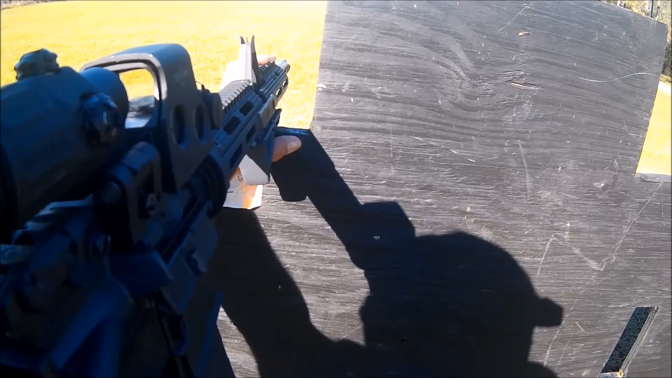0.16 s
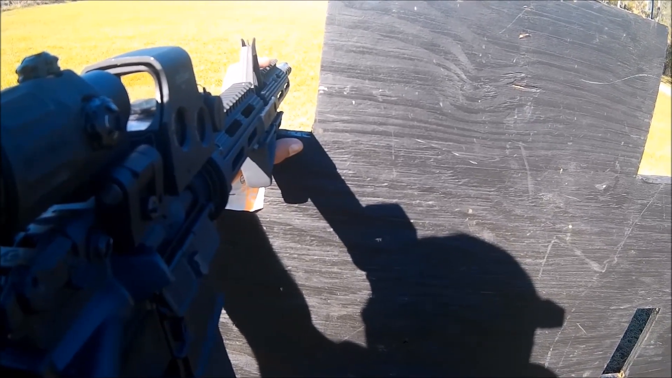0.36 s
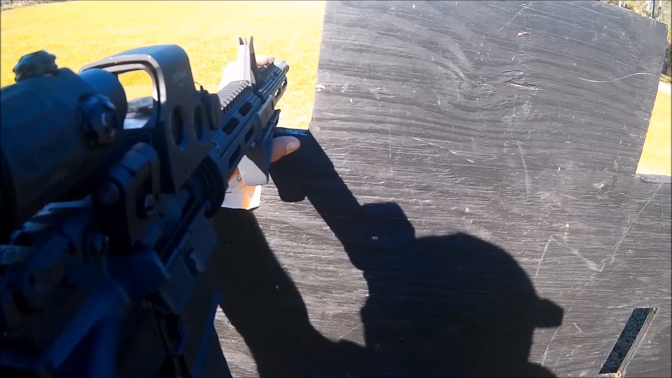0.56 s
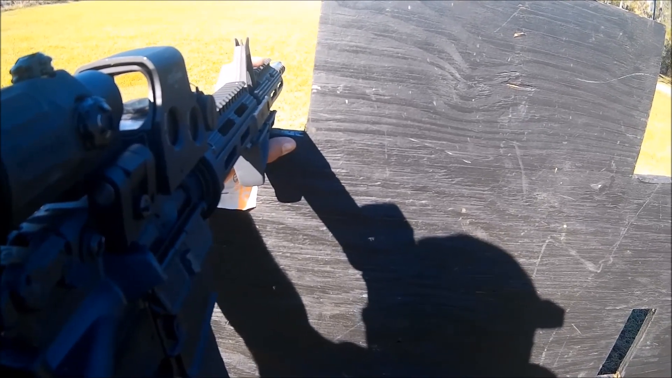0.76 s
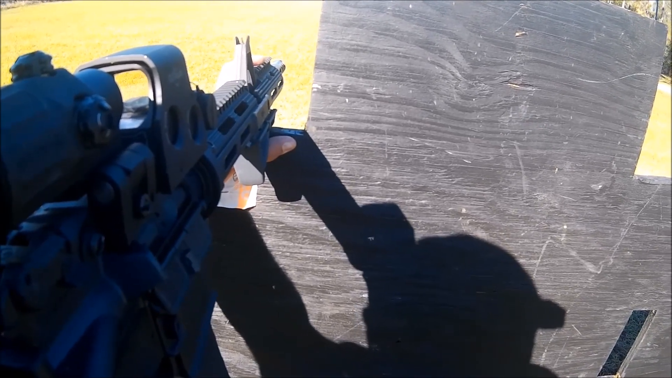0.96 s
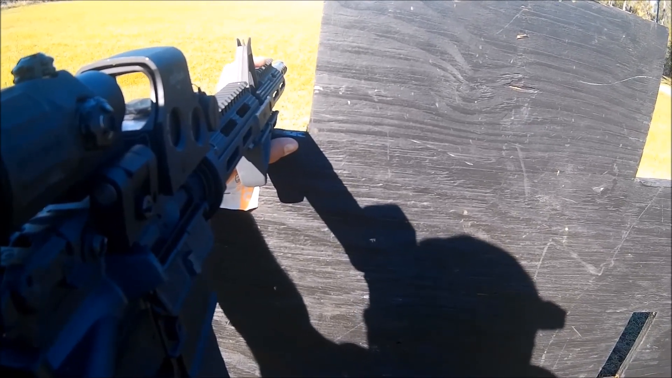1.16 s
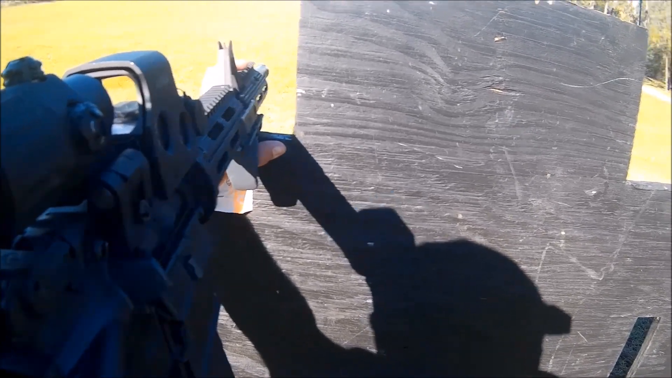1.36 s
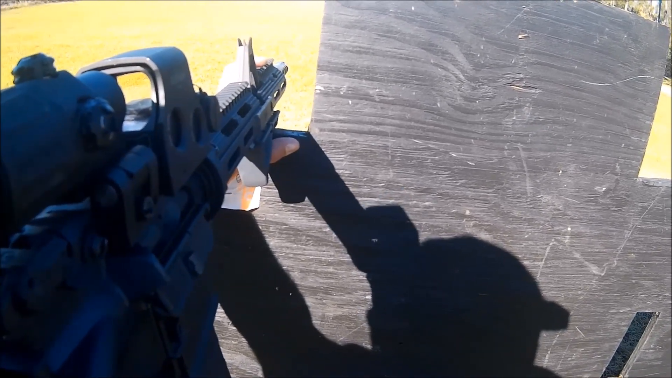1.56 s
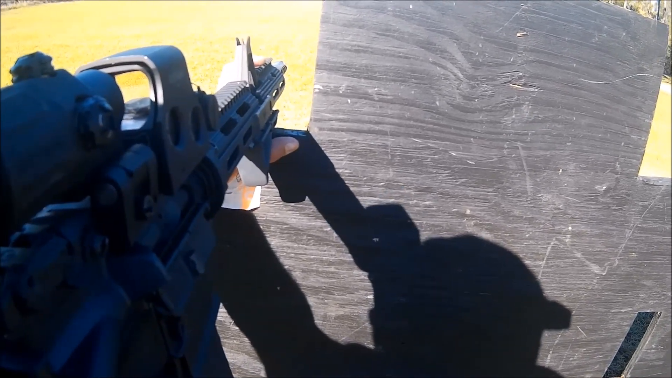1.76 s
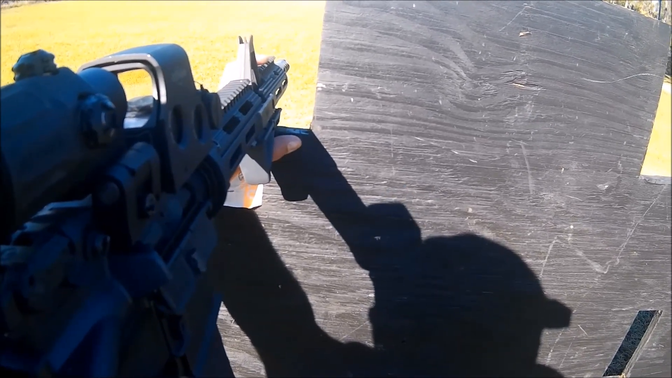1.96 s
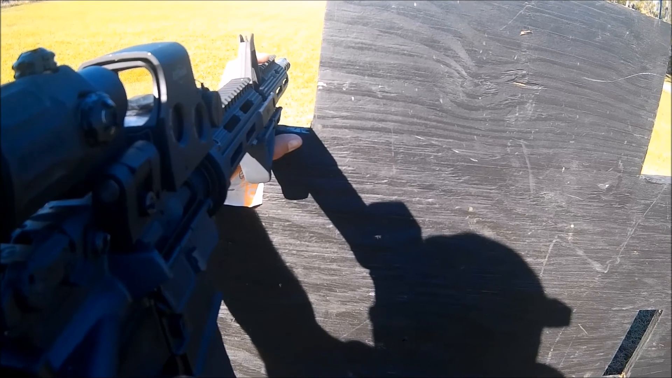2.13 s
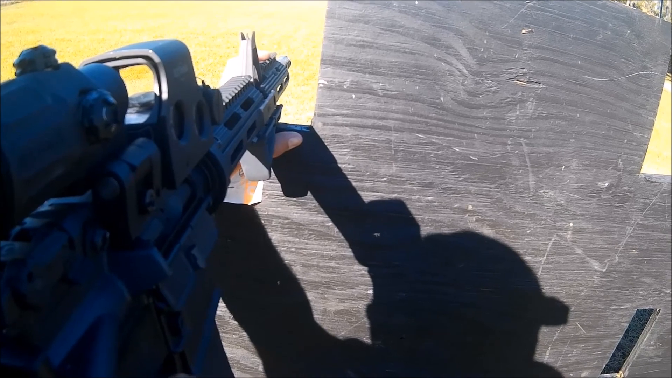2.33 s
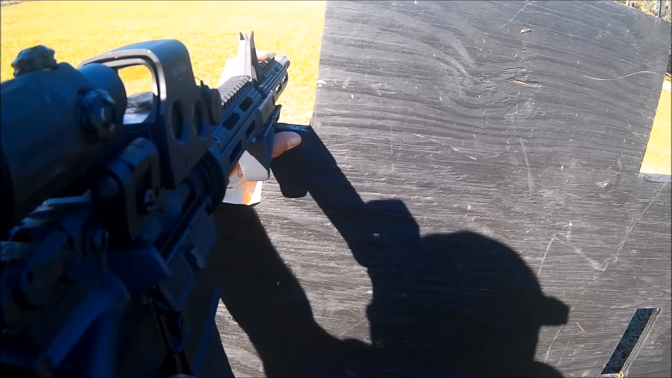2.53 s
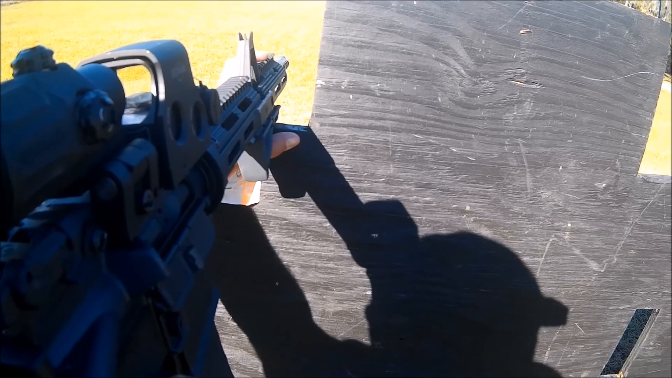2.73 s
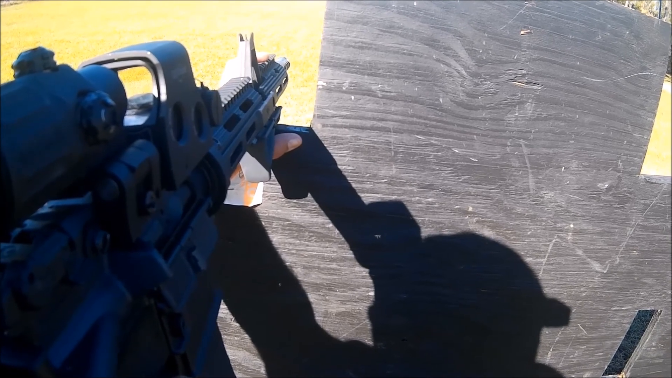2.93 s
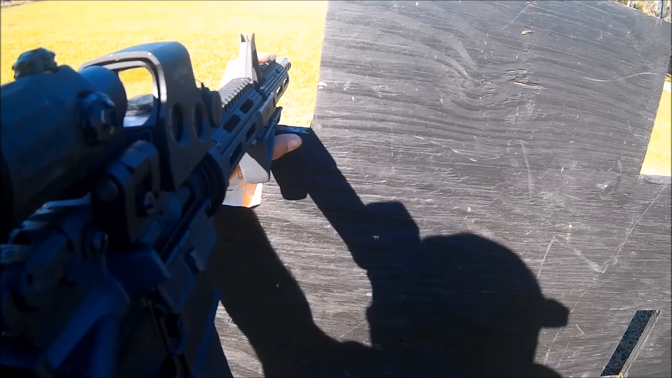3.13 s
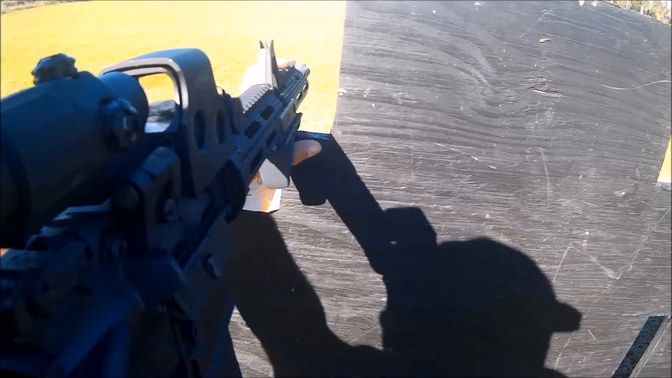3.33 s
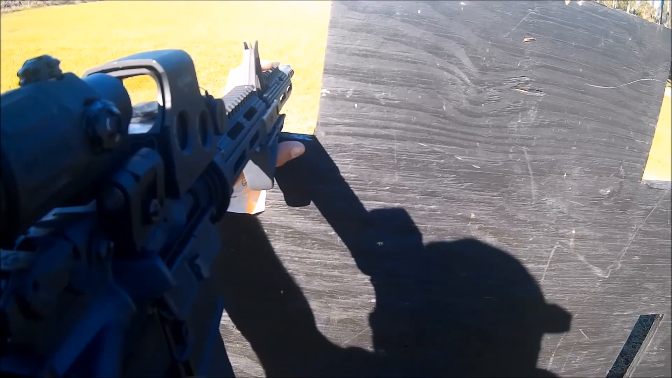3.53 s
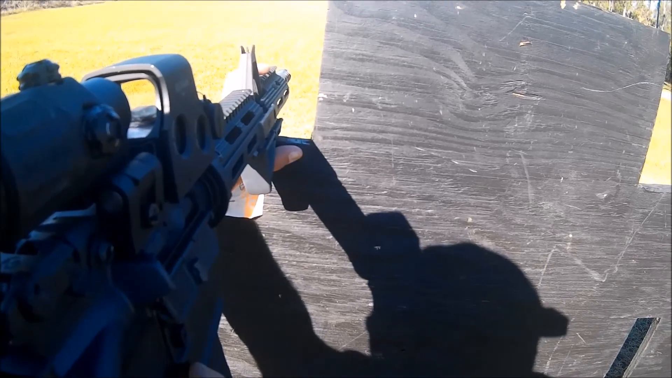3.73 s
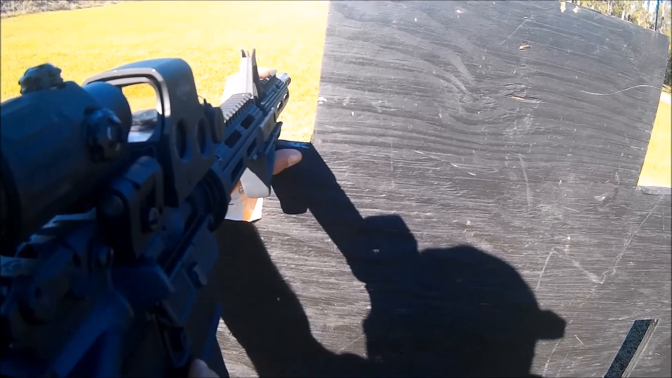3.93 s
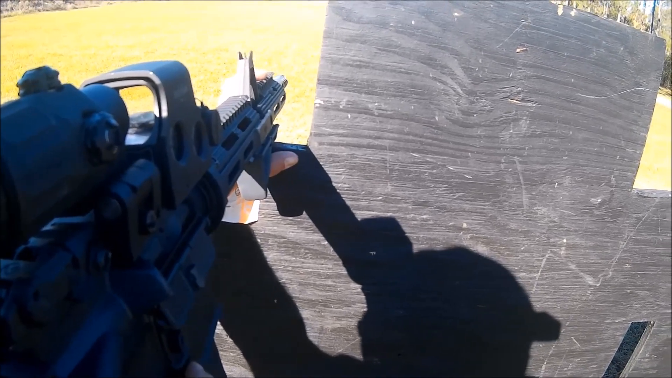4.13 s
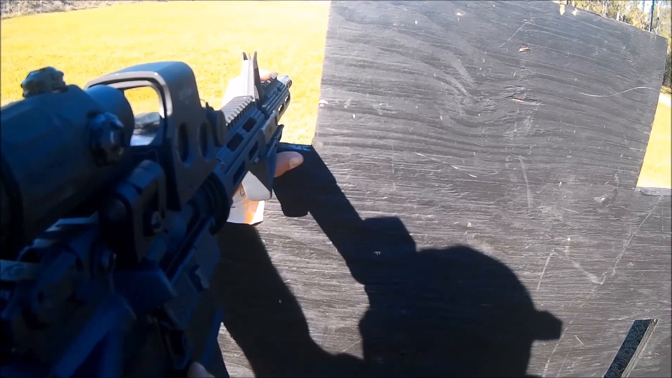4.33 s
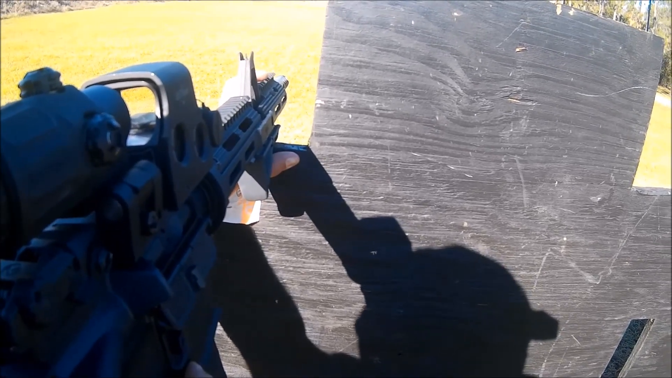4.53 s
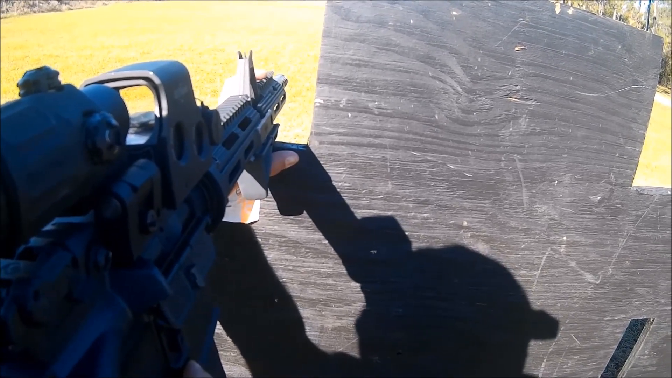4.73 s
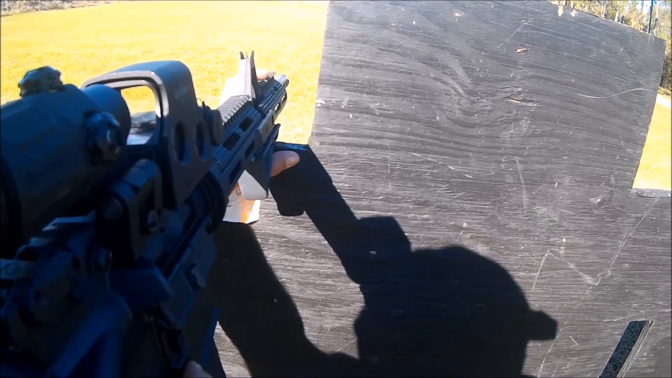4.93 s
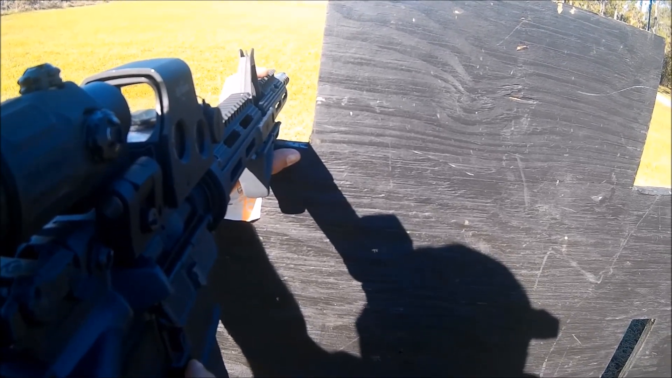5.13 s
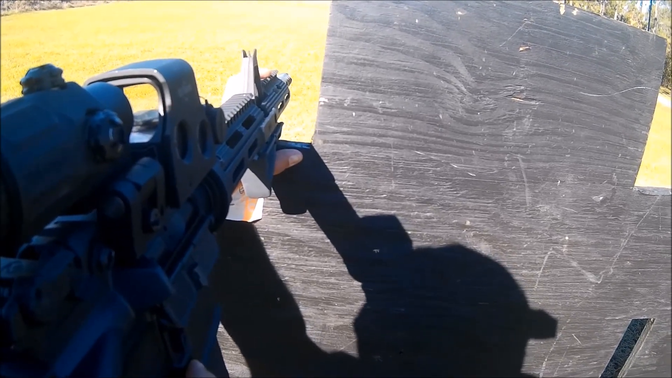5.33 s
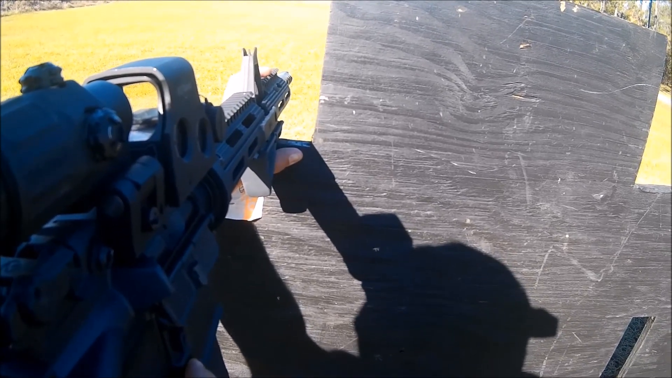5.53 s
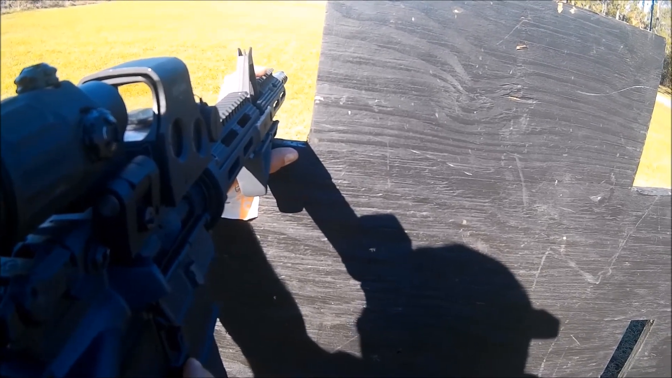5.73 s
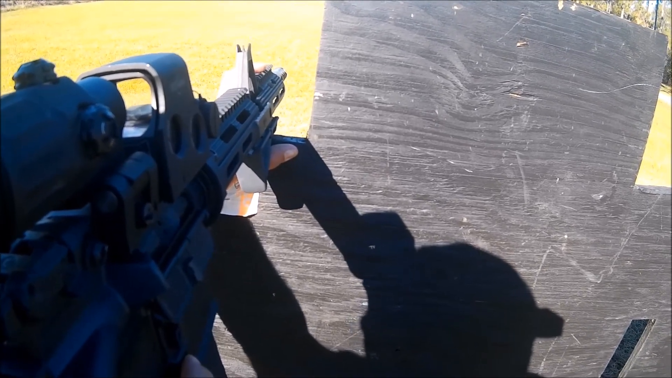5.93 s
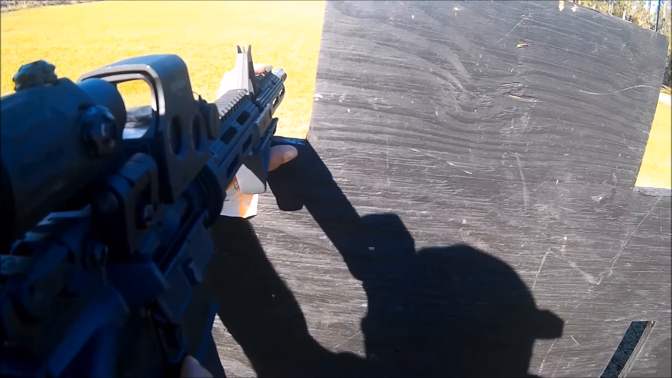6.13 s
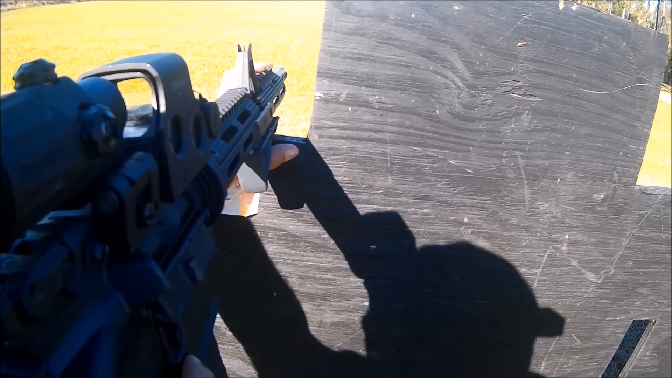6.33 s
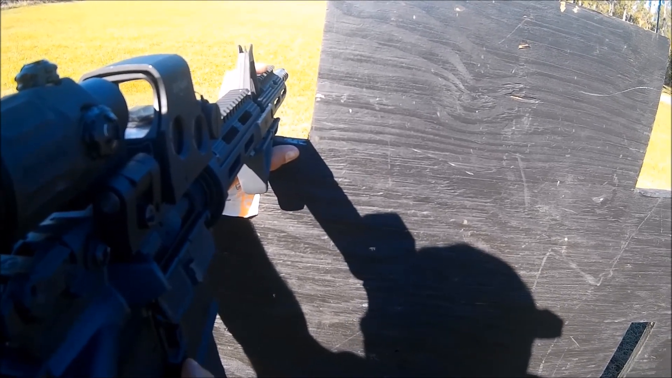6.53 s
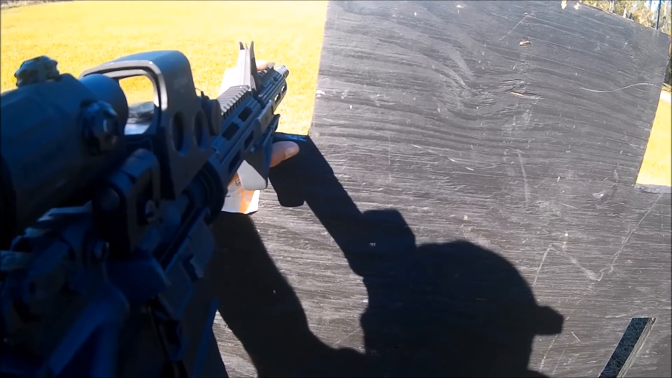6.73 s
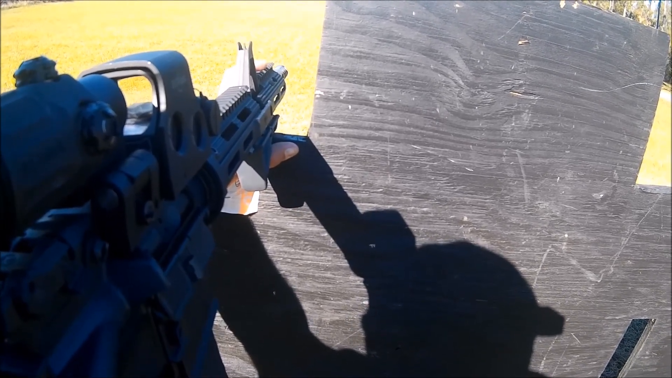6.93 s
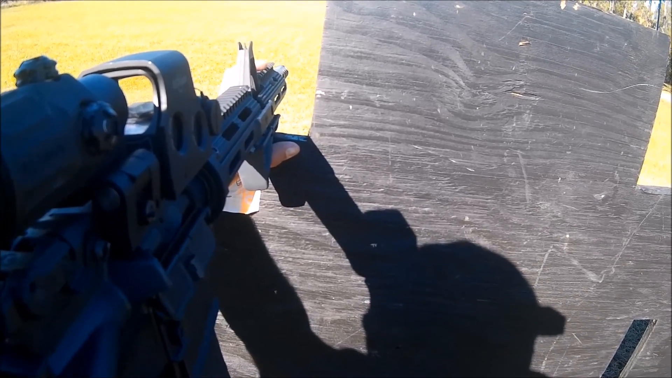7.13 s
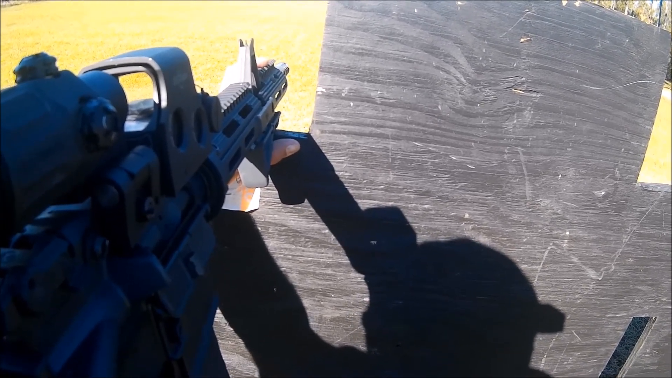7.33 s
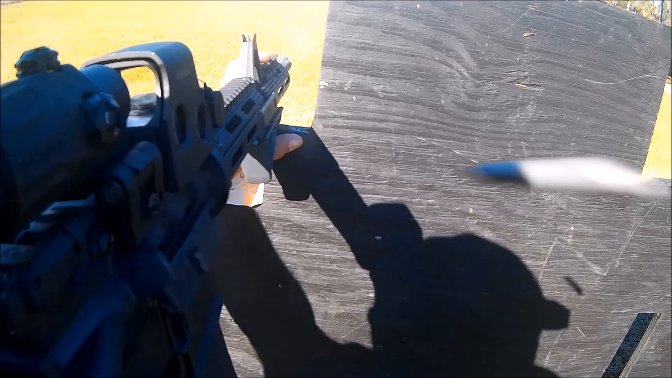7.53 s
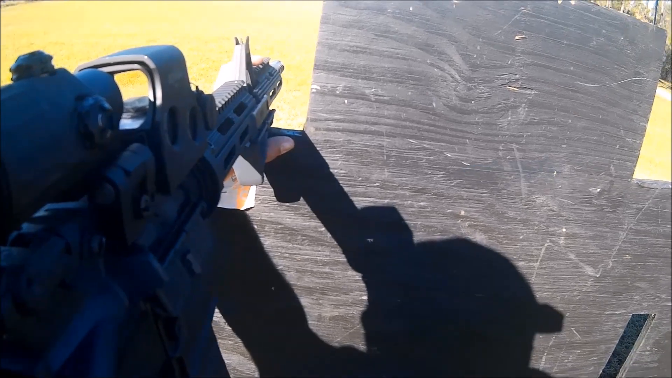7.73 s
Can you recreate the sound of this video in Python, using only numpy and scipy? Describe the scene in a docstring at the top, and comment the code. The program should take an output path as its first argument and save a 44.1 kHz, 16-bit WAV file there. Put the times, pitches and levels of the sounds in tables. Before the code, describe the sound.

Single-channel, very close microphone at the shooter's position outdoors. Echo from a previous shot and distant thuds open the scene, with a faint bullet smack downrange. Then come three widely spaced, clipped carbine blasts, the last near the end, each followed by action clatter, thin metallic ringing and lumpy echoes from a tree line. A spent case bounces brightly after the middle shot; muffled neighbouring gunfire continues over faint air hiss.

```python
"""A carbine fires slow aimed shots beside a plywood barricade on an outdoor range: N waves, a gas jet and scatter,
so close that the microphone overloads. Filtered noise bursts make the bolt's clack; steel-coloured noise rings on.
The tree line returns a long rolling echo: slaps and noise dying band by band. One spent case rings as paired sines.
Other shooters thud farther along the line, with berm slaps; a few bullets smack downrange. Coloured noise is the air."""
import sys
import numpy as np
from scipy import signal
from scipy.fft import rfft, irfft, next_fast_len
from scipy.io import wavfile
from scipy.ndimage import uniform_filter1d

SR = 44100
rng = np.random.default_rng(int(sys.argv[2]) if len(sys.argv) > 2 else 0)


def to_wav(sig):
    """Store sig (one row per channel, or 1-D mono) as 16-bit WAV at the path in sys.argv[1].

    Samples outside -1..1 are clipped; the rate is SR.
    """
    pcm = np.clip(np.atleast_2d(sig), -1, 1) * 32767
    pcm = np.round(pcm).astype(np.int16)
    wavfile.write(sys.argv[1], SR, pcm.T)  # frames by channels


N = 347508
AGE_S = np.arange(5 * SR) / SR
TOP_HZ = 15500  # upper limit of the recorded sound

# still air and microphone hiss: [f/Hz, density/dB]
AIR_COLOUR = [(10, -20), (25, 5), (90, 2), (170, -7), (300, -2), (500, -15), (800, -20), (1300, -25),
              (2500, -25), (5000, -25), (15000, -26)]
AIR_DB = -60.2
# bullets striking downrange: [t/s, level/dB before the low-pass]
SMACKS = [(.1690, -31), (2.4310, -46), (5.487, -57), (6.1272, -56)]
# colour of smacks, cracks and berm spray: [f/Hz, density/dB]
SMACK_COLOUR = [(200, -15), (700, -6), (1150, 0), (1700, -7), (2700, -11), (3800, -30), (5500, -24),
                (7500, -45), (15000, -65)]
# spent case landing and bouncing: [t/s, level/dB, contact softness as cut-off f/Hz]
BOUNCES = [(3.5995, -27, 10000), (3.6312, -28, 6500), (3.7395, -47, 7000)]
# modes of the brass case: [f/Hz, level/dB, t60/s]
BRASS_MODES = [(2745, -12, .16), (3182, -19, .25), (3890, -13, .14), (4480, -13, .1), (4860, -12, .1),
               (5300, -7, .09), (6078, -13, .1), (6400, -9, .08), (6750, -3, .04), (7009, -6, .08),
               (8750, -1, .05), (10900, -15, .02)]
# other shooters: [t/s, level/dB before the thud's filters, berm slap delay/s, echo gain/dB]
NEIGHBOURS = [(.0343, -13.5, .074, -28), (.2053, -12.5, .073, -26), (.3155, -21, .056, -42),
              (.857, -32, .056, -44), (1.7585, -9.5, .056, -33), (2.2708, -13.5, .058, -36),
              (4.1035, -13.5, .056, -36), (4.2503, -13, .055, -35), (5.3135, -25.5, .047, -44),
              (5.462, -39, .056, -58), (5.9520, -26.5, .047, -39), (7.3655, -31, .056, -58)]
# crack level for a 0 dB neighbour; dB of crack per dB of thud
CRACK_DB, CRACK_DB_PER_DB = -32.5, .7

# colour of the far woods' roll: [f/Hz, density/dB]
ROLL_COLOUR = [(30, -4), (90, -2), (170, -5.5), (330, 0), (520, -8), (760, -5.5), (1100, -12), (2000, -12),
               (2900, -16), (3800, -29), (8000, -38), (15000, -58)]
# decay of the roll, treble lost to the air: [f/Hz, t60/s]
ROLL_DECAY = [(40, 7), (150, 5.9), (320, 7.5), (750, 6.2), (1200, 3.7), (2500, 3), (5000, 2), (12000, 1)]
# colour of the tree line's answer: [f/Hz, density/dB]
TREE_COLOUR = [(30, -25), (80, -19), (130, -3), (200, 0), (270, -1), (380, -5), (520, -15), (770, -9),
               (1100, -19), (1600, -24.5), (2700, -25), (3700, -36), (8000, -36), (15000, -70)]
# air loss on longer paths, on top of the tree swell: [f/Hz, t60/s]
TREE_DECAY = [(100, 30), (1000, 15), (3000, 6), (6000, 2), (12000, .8)]
# clearest slaps off berm and big trunks: [delay/s, level/dB before filters, overpressure/s]
SLAPS = [(.1215, -20, .0010), (.1445, -7, .0006), (.2175, -9, .0018), (.2505, -10, .0018),
         (.296, -8, .0006)]
SLAP_SHARPNESS = 1.3  # top/Hz times overpressure/s: longer slaps have rounder fronts
# nearest trunks start the answer; it swells, holds over the depth of the wood and dies
TREES_DB, TREES_START_S, TREES_RISE_S, TREES_HOLD_S, TREES_T60_S = -20, .115, .05, .14, .92

# contacts of the action: [t/s from bolt closing, level/dB, t60/s]
ACTION_CONTACTS = [(-.0140, -15, .035), (-.0030, -10, .02), (-.0005, 2, .012), (.002, -12, .07),
                   (.059, -22, .02)]
# resonances of the action: [f/Hz, width/Hz, level/dB]
RECEIVER_MODES = [(340, 160, -6), (1250, 500, -11), (2170, 500, -7), (3450, 380, -15), (4730, 200, -15),
                  (5590, 300, -11), (6800, 380, 2), (7880, 700, -9), (9000, 700, -16), (11300, 800, -16)]
# dense high ring of the carbine's steel: [f/Hz, density/dB]
STEEL_COLOUR = [(1500, -30), (4000, -14), (4700, -9), (6000, -13), (6600, 0), (7500, -1), (8800, -8),
                (10200, -22), (11700, -16), (13000, -23), (16000, -34)]
# scatter off things close by: [f/Hz, density/dB]
NEAR_COLOUR = [(30, -3), (100, -12), (180, 0), (350, 1), (560, -11), (730, -12), (1200, -23), (2200, -22),
               (3500, -35), (7000, -32), (12000, -42), (16000, -56)]
# muzzle blast: direct, then off barricade, ground and shooter:
# [delay/s, level/dB before the low-pass, overpressure/s]
BLAST_PATHS = [(.0007, 22, .0016), (.0041, 33, .0033), (.0096, 20, .0015), (.0121, 15, .0011),
               (.0152, 1, .0014), (.0191, 9, .0010), (.0243, -7, .0012)]
# later paths are duller: the top falls by a factor e in BLAST_DULLS_S
BLAST_TOP_HZ, BLAST_DULLS_S = 15000, .0065
# carbine shots, the first already rolling away: [t/s, level/dB, bolt closing delay/s]
SHOTS = [(-0.70, 0, .062), (1.2866, 0, .0625), (3.2178, 0, .0605), (7.5332, 0, .0625)]


def from_db(db):
    """Decibels to gain."""
    return 10 ** (np.asarray(db) / 20)


def at_hz(points, hz):
    """Read a table on a log-frequency axis."""
    table = np.array(points)
    return np.interp(np.log(hz + 1e-9), np.log(table[:, 0]), table[:, 1])


def fade(t60_s, size):
    """Exponential decay from 1."""
    return np.exp(-np.log(1000) * AGE_S[:size] / t60_s)


def cut(x, hz, kind, order=2):
    """Causal low-pass or high-pass."""
    sos = signal.butter(order, min(hz, SR / 2 - 1), kind, fs=SR, output="sos")
    return signal.sosfilt(sos, x + 1e-18)


def add(track, start_s, sound):
    """Mix a sound into a track at a time, which may lie before the start."""
    at = round(start_s * SR)
    part = sound[max(-at, 0):max(len(track) - at, 0)]
    track[max(at, 0):max(at, 0) + len(part)] += part


def noise(colour, size, lumpy_db=0):
    """Coloured noise, rms 1; when lumpy it comes in clumps a few milliseconds long."""
    clumps = uniform_filter1d(rng.standard_normal(size), size=300)
    lump_gain = from_db(lumpy_db * np.clip(clumps / np.std(clumps), -2, 2))
    white = rng.standard_normal(size) * lump_gain
    colour_gain = from_db(at_hz(colour, np.fft.rfftfreq(size, 1 / SR)))
    x = irfft(rfft(white) * colour_gain, size)
    return x / np.std(x)


def resonate(x, hz, width_hz):
    """Two-pole resonance with gain 1 on top."""
    r = np.exp(-np.pi * width_hz / SR)
    zeros = np.array([1, 0, -1]) * (1 - r * r) / 2
    poles = [1, -2 * r * np.cos(2 * np.pi * hz / SR), r * r]
    return signal.lfilter(zeros, poles, x)


def waver(size, turns_per_s):
    """Random values between -1 and 1, joined by straight lines."""
    turns = rng.uniform(-1, 1, SR // 50)
    return np.interp(AGE_S[:size] * turns_per_s, np.arange(len(turns)), turns)


def dying_noise(colour, decay, size, lumpy_db, patchy_db, patches_per_s, count=32):
    """Scattered sound: each band wavers on its own and dies at its own rate."""
    spectrum = rfft(noise(colour, size, lumpy_db))
    centres_hz = np.geomspace(100, TOP_HZ, count)
    hz = np.fft.rfftfreq(size, 1 / SR)
    out = np.zeros(size)
    for centre_hz, share in zip(centres_hz, np.eye(count)):
        band = irfft(spectrum * np.interp(hz, centres_hz, share), size)
        patches = from_db(patchy_db * waver(size, patches_per_s))
        out += band * fade(at_hz(decay, centre_hz), size) * patches
    return out


def blast_wave(push_s, suction=1):
    """N wave: shock, fall through zero into suction (length relative to push), closing shock."""
    t = AGE_S[:SR // 8] / push_s
    return (1 - t) * (t < 1 + suction)


def arrivals(paths, suction=.66):
    """N waves along paths (delay/s, level/dB, overpressure/s, top/Hz), fronts rounded by a low-pass."""
    out = np.zeros(len(AGE_S))
    for delay_s, db, push_s, top_hz in paths:
        add(out, delay_s, from_db(db) * cut(blast_wave(push_s, suction), top_hz, "low"))
    return out


def air():
    """Still air and hiss: steady coloured noise."""
    return from_db(AIR_DB) * noise(AIR_COLOUR, next_fast_len(N))[:N]


def bullet_smacks(t60_s=.055, top_hz=2100):
    """Bullets striking downrange: short, dull noise bursts."""
    out, size = np.zeros(N), SR // 10
    for start_s, db in SMACKS:
        burst = noise(SMACK_COLOUR, size) * fade(t60_s, size)
        add(out, start_s, from_db(db) * cut(burst, top_hz, "low"))
    return out


def spent_case(tick_db=2, tick_t60_s=.016, ring_db=-8.5, split=.009):
    """Brass ticks on hard ground; each bounce rings split mode pairs with new strengths."""
    out, size = np.zeros(N), SR // 2
    for start_s, db, soft_hz in BOUNCES:
        ring = np.zeros(size)
        for mode_hz, mode_db, t60_s in BRASS_MODES:
            for side in (-1, 1):
                hz = mode_hz * (1 + side * split)
                gain = from_db(mode_db + rng.normal(0, 2))
                cycles = hz * AGE_S[:size] + rng.random()
                ring += gain * np.sin(2 * np.pi * cycles) * fade(t60_s, size)
        tick = cut(rng.standard_normal(size), 4000, "high") * fade(tick_t60_s, size)
        contact = from_db(ring_db) * ring + from_db(tick_db) * tick
        add(out, start_s, from_db(db) * cut(contact, soft_hz, "low", order=6))
    return out


def thud(push_s=.0042, suction=.75, low_hz=52, top_hz=450):
    """Blast from down the line: an N wave with rounded fronts."""
    return cut(cut(blast_wave(push_s, suction), top_hz, "low"), low_hz, "high")


def berm_slap(thump_db=-16, spray_db=-29.5, spray_t60_s=.2, spray_top_hz=1700):
    """The berm returns a neighbour's shot as a weak thump smeared into a spray."""
    size = SR // 2
    spray = noise(SMACK_COLOUR, size) * fade(spray_t60_s, size)
    out = from_db(spray_db) * cut(spray, spray_top_hz, "low")
    add(out, 0, from_db(thump_db) * thud(push_s=.003))
    return out


def neighbours(trees, roll, crack_t60_s=.085, scatter_db=-21, scatter_t60_s=.5, scatter_top_hz=2500,
               trees_db=0, roll_gain_db=13.5, echo_top_hz=900, far_trees_db=1, far_trees_s=.4):
    """Thud, thin crack, scatter, berm slap and a dull answer from near and far woods."""
    out, size = np.zeros(N), SR // 2
    woods = from_db(trees_db) * trees + from_db(roll_gain_db) * roll
    add(woods, far_trees_s, from_db(far_trees_db) * trees)
    echo = cut(woods, echo_top_hz, "low")
    for start_s, db, slap_s, echo_db in NEIGHBOURS:
        crack_db = CRACK_DB + CRACK_DB_PER_DB * db
        crack = noise(SMACK_COLOUR, size) * fade(crack_t60_s, size)
        scatter = noise(NEAR_COLOUR, size) * fade(scatter_t60_s, size)
        add(out, start_s, from_db(db) * thud())
        add(out, start_s, from_db(crack_db) * crack)
        add(out, start_s, from_db(db + scatter_db) * cut(scatter, scatter_top_hz, "low"))
        add(out, start_s + slap_s, from_db(db) * berm_slap())
        add(out, start_s, from_db(echo_db) * echo)
    return out


def far_roll(level_db=-34.3, start_s=.12, rise_s=.2, lumpy_db=1.4, surge_db=1.6, surges_per_s=9,
             patchy_db=2.5, patches_per_s=12):
    """Echoes from ever farther woods return in uneven waves."""
    size = len(AGE_S)
    rise = np.clip((AGE_S - start_s) / rise_s, 0, 1)
    level = from_db(level_db + surge_db * waver(size, surges_per_s)) * rise
    return level * dying_noise(ROLL_COLOUR, ROLL_DECAY, size, lumpy_db, patchy_db, patches_per_s)


def tree_swell(t_s):
    """Attack, hold and release of the tree line's answer, top 1."""
    rise = np.clip((t_s - TREES_START_S) / TREES_RISE_S, 0, 1)
    past_hold_s = np.maximum(t_s - TREES_START_S - TREES_RISE_S - TREES_HOLD_S, 0)
    return rise * from_db(-60 * past_hold_s / TREES_T60_S)


def trunk_slaps(level_db=-17.5, spread_db=2.5, depth_s=.4, shortest_s=.0004, longest_s=.0016, count=12):
    """Lesser slaps from trunks scattered through the wood: rows like SLAPS."""
    place, strength, girth = rng.random((count, 3)).T
    delay_s = TREES_START_S + depth_s * (np.arange(count) + place) / count
    swell_db = 20 * np.log10(tree_swell(delay_s) + 1e-9)
    db = level_db + spread_db * (2 * strength - 1) + swell_db
    push_s = shortest_s + (longest_s - shortest_s) * girth
    return list(zip(delay_s, db, push_s))


def tree_echo(lumpy_db=2.4, patchy_db=4, patches_per_s=45, slap_low_hz=125, slap_top_hz=1800):
    """Countless trunks answer as one lumpy swell, with a few slaps standing out."""
    size = 2 * SR
    paths = [(delay_s, db, push_s, SLAP_SHARPNESS / push_s)
             for delay_s, db, push_s in SLAPS + trunk_slaps()]
    out = cut(cut(arrivals(paths), slap_low_hz, "high"), slap_top_hz, "low")
    wash = dying_noise(TREE_COLOUR, TREE_DECAY, size, lumpy_db, patchy_db, patches_per_s)
    add(out, 0, from_db(TREES_DB) * wash * tree_swell(AGE_S[:size]))
    return out


def action(level_db=-1.5, steel_db=-41.5, steel_t60_s=1.02, closes_s=.06):
    """Carrier hits the buffer, strips a round and slams shut; the steel rings on from the shot."""
    contacts = np.zeros(SR)
    for start_s, db, t60_s in ACTION_CONTACTS:
        burst = rng.standard_normal(SR // 8) * fade(t60_s, SR // 8)
        add(contacts, closes_s + start_s, from_db(db) * burst)
    clack = np.zeros(SR)
    for k, (hz, width_hz, db) in enumerate(RECEIVER_MODES):
        clack += (-1) ** k * from_db(db) * resonate(contacts + 1e-18, hz, width_hz)  # alternating polarity
    steel = noise(STEEL_COLOUR, SR) * fade(steel_t60_s, SR)
    return from_db(level_db) * clack + from_db(steel_db) * steel


def muzzle(gas_db=16, gas_t60_s=.019, gas_peak_s=.0019, gas_top_hz=8500,
           heave_db=11.5, heave_hz=40, heave_t60_s=.052, near_db=4.5, near_t60_s=.066,
           linger_db=-29, linger_t60_s=.7, linger_top_hz=900):
    """Blast and first reflections, tearing gas jet, slow heave and scatter from things close by."""
    size = SR // 2
    t = AGE_S[:size]
    jet_rise = np.minimum(t / gas_peak_s, 1) ** 2
    jet_fall = from_db(-60 * np.maximum(t - gas_peak_s, 0) / gas_t60_s)
    jet = from_db(gas_db) * cut(rng.standard_normal(size), gas_top_hz, "low") * jet_rise * jet_fall
    # the ball of gas expands and falls back in a slow, damped swing
    heave = from_db(heave_db) * np.sin(2 * np.pi * heave_hz * t) * fade(heave_t60_s, size)
    near = noise(NEAR_COLOUR, size)
    scatter = from_db(near_db) * near * fade(near_t60_s, size)
    dull = cut(near, linger_top_hz, "low", order=1)
    scatter += from_db(linger_db) * dull * fade(linger_t60_s, size)
    paths = [(delay_s, db, push_s, BLAST_TOP_HZ * np.exp(-delay_s / BLAST_DULLS_S))
             for delay_s, db, push_s in BLAST_PATHS]
    return arrivals(paths)[:size] + jet + (heave + scatter) * np.minimum(t / .004, 1)


def carbine(echo):
    """Every shot leaves from the same spot, so the land answers each one alike."""
    out = np.zeros(N)
    for start_s, db, closes_s in SHOTS:
        for sound in (muzzle(), action(closes_s=closes_s), echo):
            add(out, start_s, from_db(db) * sound)
    return out


def scene():
    """Quiet air, downrange smacks, spent case, neighbours and the carbine, in one channel."""
    trees, roll = tree_echo(), far_roll()
    background = air() + bullet_smacks() + spent_case()
    shooting = neighbours(trees, roll) + carbine(trees + roll)
    return (background + shooting)[None]


def record(dry, ceiling=.97):
    """Overload clips the blast flat; a steep zero-phase low-pass then cuts the top."""
    clipped = np.clip(dry, -ceiling, ceiling)
    return signal.sosfiltfilt(signal.butter(24, TOP_HZ, fs=SR, output="sos"), clipped)


dry = scene()
out = record(dry)
to_wav(out)
```